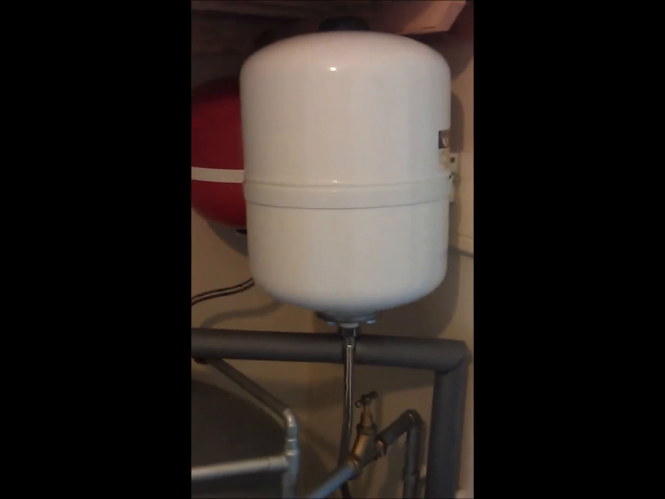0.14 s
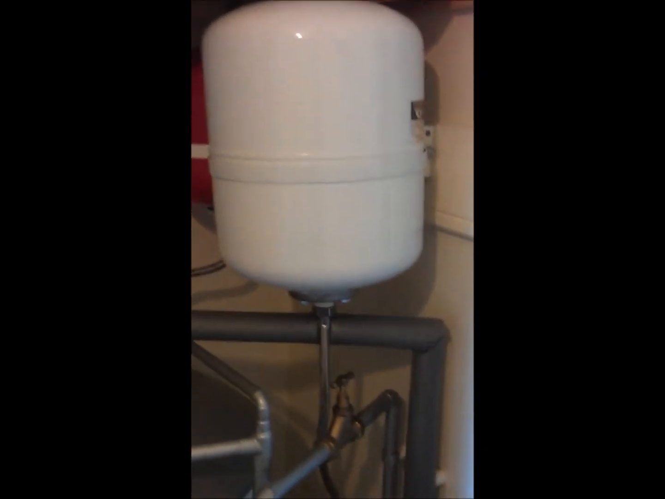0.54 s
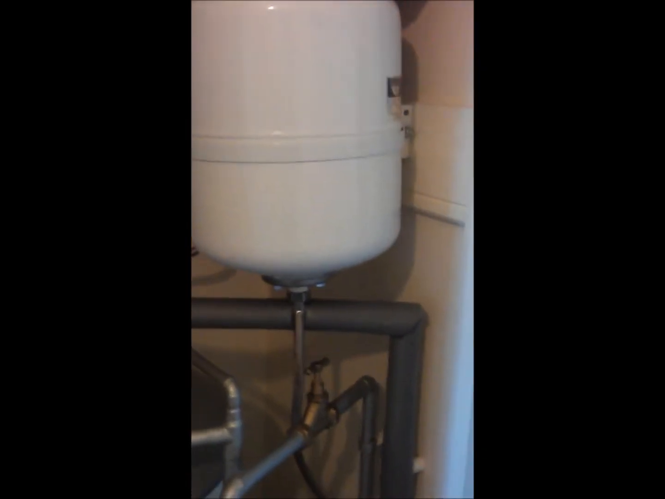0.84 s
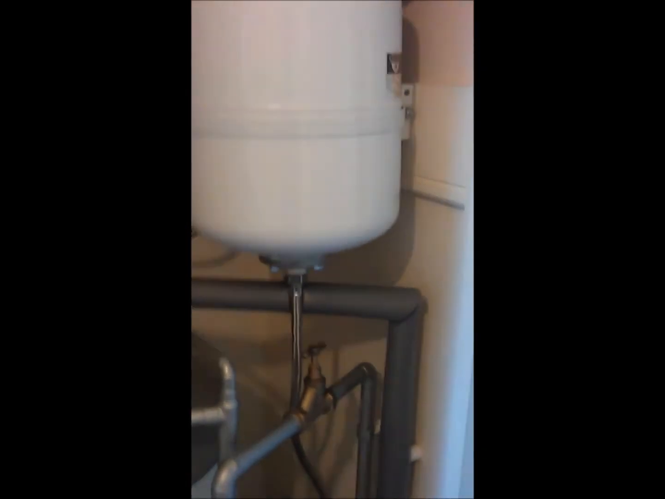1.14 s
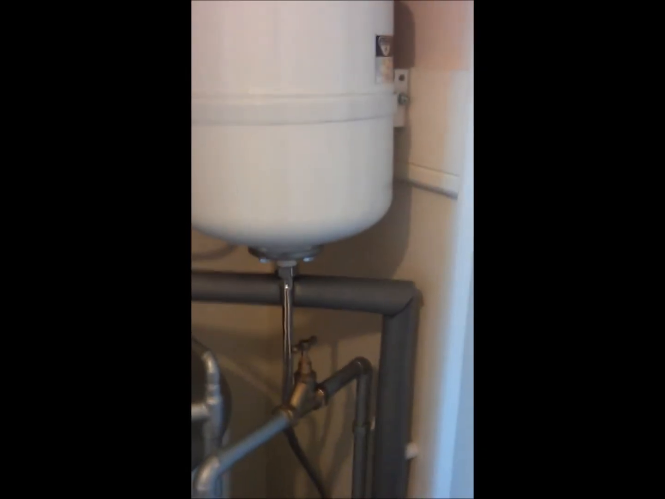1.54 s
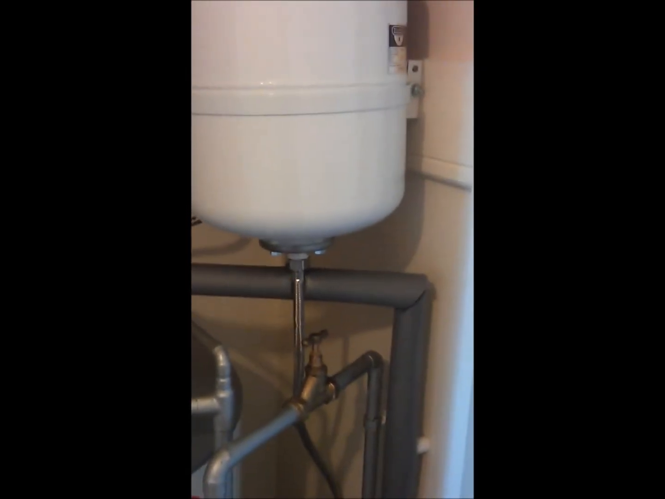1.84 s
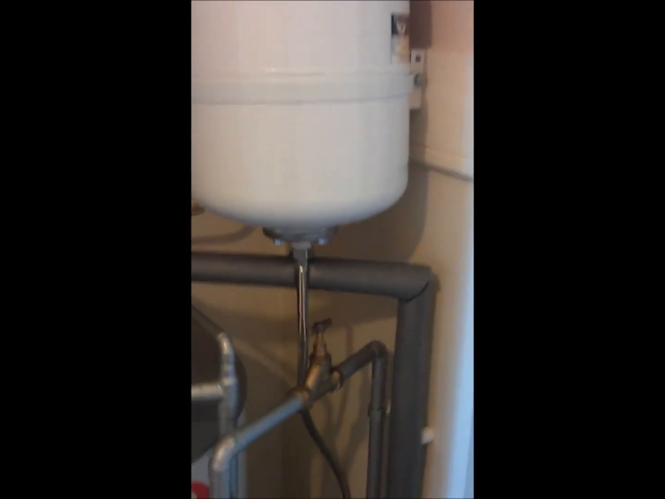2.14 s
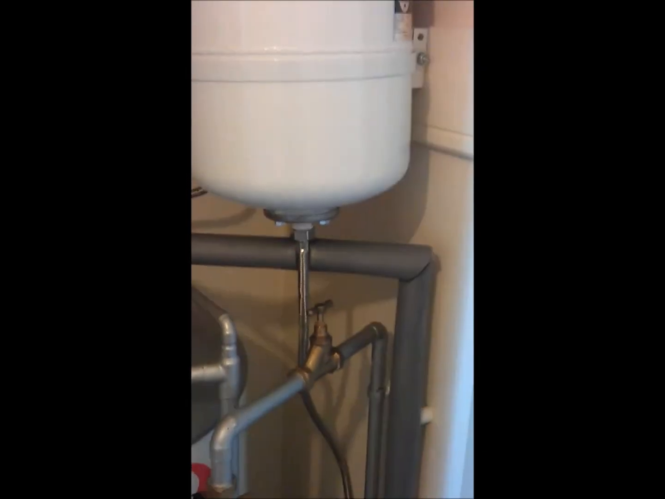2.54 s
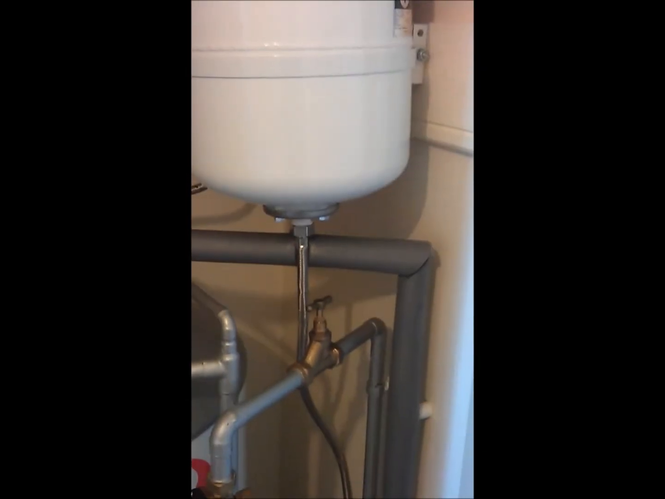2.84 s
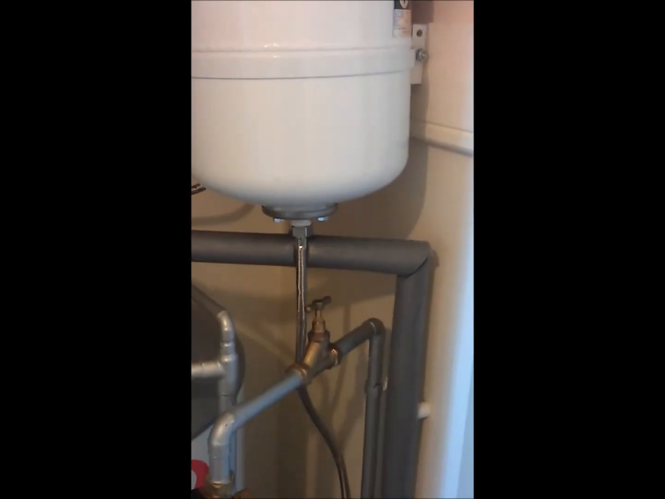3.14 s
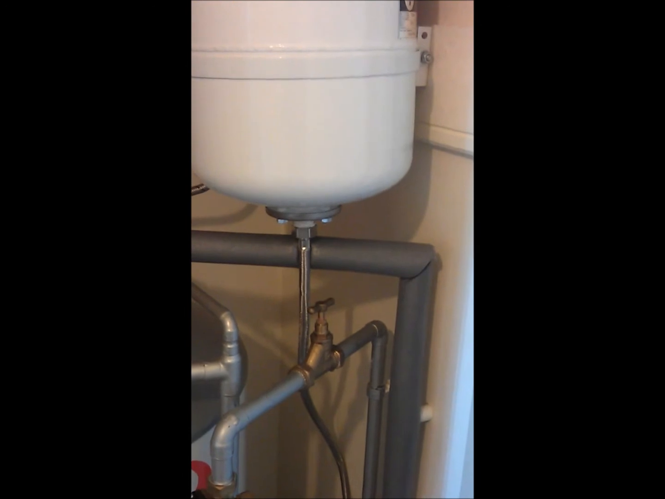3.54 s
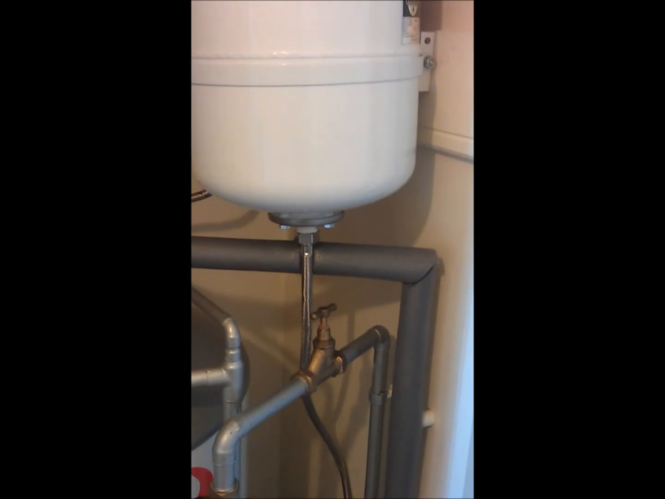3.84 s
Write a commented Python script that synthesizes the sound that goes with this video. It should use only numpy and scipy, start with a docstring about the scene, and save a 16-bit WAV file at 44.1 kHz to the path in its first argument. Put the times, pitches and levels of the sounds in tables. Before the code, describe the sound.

Loud hollow pipe bangs with metallic rattles come first, then steady softer knocks, then tiny rapid taps and water spits, ending in a faint buzz and thin hiss; heard close in a house cupboard.

```python
"""A valve slams about eight times a second under a small tank in a house: water hammer, on two microphones.
Each slam rings the pipework's modes, a dense decaying noise and short sliding tocks of bending waves.
Early on, loose metal clanks as crackling noise bursts with ringing tones. The slams then weaken into a light
chatter, with ticks of spitting water, and a faint hum at multiples of the chatter rate.
Behind it, running water rumbles, sings and hisses as filtered noise and steady tones, and mostly fades."""
import sys
import numpy as np
from scipy import signal
from scipy.fft import rfft, irfft, next_fast_len
from scipy.io import wavfile
from scipy.ndimage import map_coordinates

SR = 44100
rng = np.random.default_rng(int(sys.argv[2]) if len(sys.argv) > 2 else 0)


def unload_audio(sound):
    """Save the sound as a 16-bit wav file, at the path given as the first command line argument."""
    columns = np.transpose(np.atleast_2d(sound))
    # keep every value between -1 and 1, then stretch to whole-number steps
    steps = np.round(np.clip(columns, -1, 1) * 32767)
    wavfile.write(sys.argv[1], SR, steps.astype(np.int16))


N = 176400  # samples: four seconds
ALIKE = 0.22  # left-right correlation of the diffuse sound
CRACKLE_DB = 2  # level scatter within a clank or a spit


def amp(db):
    """Decibels to gain."""
    return 10 ** (np.asarray(db) / 20)


def unit(x):
    """Scale to rms 1."""
    return x / np.sqrt(np.mean(x ** 2) + 1e-20)


def seconds(size):
    """Time of each sample [s]."""
    return np.arange(size) / SR


def along(points, hz):
    """Interpolate (frequency [Hz], value) points on a log frequency axis."""
    f, v = np.transpose(points)
    return np.interp(np.log(hz + 1), np.log(f + 1), v)


def curves(rows):
    """One value per sample for each column after the time."""
    s, *cols = np.transpose(rows)
    return [np.interp(seconds(N), s, c) for c in cols]


def wobble(rate, size=N):
    """A smooth random curve with rate knots a second."""
    knots = rng.standard_normal(1024)
    return map_coordinates(knots, [np.arange(size) * rate / SR], mode="wrap")


def filtered(x, response):
    """Multiply the spectrum of x by a response of frequency."""
    n = x.shape[-1]
    m = next_fast_len(n + 8192)
    gain = response(np.fft.rfftfreq(m, 1 / SR))
    return irfft(rfft(x, m) * gain, m)[..., :n]


def noise(size, response, alike=ALIKE):
    """Coloured stereo noise of rms 1, its two sides partly alike."""
    middle, side = rng.standard_normal((2, size))
    angle = np.arccos(np.clip(alike, -1, 1)) / 2
    stereo = np.cos(angle) * middle + np.outer([1, -1], np.sin(angle) * side)
    return unit(filtered(stereo, response))


def add(out, s, sound):
    """Mix a sound in at time s [s]."""
    part = out[:, max(round(s * SR), 0):][:, :sound.shape[1]]
    part += sound[:, :part.shape[1]]


# valve slams: (time [s], level [dB])
SLAMS = [(.02, -13), (0.1542, -17.5), (0.278, -7), (.4123, -23), (0.4729, -21.5), (.5374, -24), (.662, -19),
         (0.784, -16), (0.913, -19), (1.033, -15.5), (1.1561, -19), (1.277, -21.5), (1.3943, -20.5),
         (1.5123, -22), (1.6256, -24), (1.7366, -23.5), (1.8498, -26), (1.9572, -25.5), (2.069, -24.5),
         (2.1761, -28.5), (2.281, -31), (2.3802, -36.5)]
FRESH_DB = -13  # extra thud drawn anew for each slam


def knocks(ring):
    """Every slam rings the same pipes, with travelling waves and a small thud that differ each time."""
    out = np.zeros((2, N))
    for s, db in SLAMS:
        add(out, s, amp(db) * (ring + waves() + amp(FRESH_DB) * thud()))
    return out


BEND_DELAY_S, BEND_RISE_S = 0.00092, 0.0017  # at 1 kHz


def arrival(t, hz):
    """Onset of a bending wave: low notes travel more slowly, come later and swell more gently."""
    slow = np.sqrt(1000 / np.maximum(hz, 100))
    since = np.maximum(t - BEND_DELAY_S * slow, 0)
    return 1 - np.exp(-since / (BEND_RISE_S * slow ** 2))


# pipework modes: (frequency [Hz], left level [dB], right level [dB], 60 dB decay [s])
PIPE_MODES = [(208, -7.5, -9, 0.23), (237.6, -5.5, -13, .45), (296.7, 8.5, -5.5, 0.19),
              (354.4, -9, -25, 0.25), (492, 5, -9, .25), (582, -34, -7, 0.32), (700, -14, 6, 0.19),
              (867, -1.5, -8, 0.23), (1156, -17, -3.5, 0.2)]
RING_DB, THUD_DB = -10.5, -4.5  # modes and dense ringing


def pipe_ring():
    """The pipework's answer to a slam: decaying modes and dense ringing at both microphones."""
    t = seconds(SR // 2)
    phases = rng.uniform(0, 2 * np.pi, len(PIPE_MODES))
    modes = np.zeros((2, len(t)))
    for (hz, left, right, t60), phase in zip(PIPE_MODES, phases):
        tone = np.sin(2 * np.pi * hz * t + phase + lead(hz))
        modes += amp([[left], [right]]) * tone * arrival(t, hz) * amp(-60 * t / t60)
    return amp(RING_DB) * modes + amp(THUD_DB) * thud()


# dense ringing of the pipes and cupboard: (frequency [Hz], left level [dB], right level [dB])
THUD_COLOUR = [(40, -48, -50), (130, -21, -7), (275, 7, -15), (370, 2, 1), (660, 1, 4), (986, -0.5, -16),
               (1240, -12, -1.5), (1580, -13.5, -13.5), (3330, -15, -14.5), (5496, -27.5, -31),
               (11900, -61, -62)]
# its dying away: (frequency [Hz], 60 dB decay [s])
THUD_DECAY = [(150, 0.55), (300, 0.41), (800, 0.25), (1500, 0.24)]


def thud():
    """Dense ringing after one slam: noise in which each frequency dies at its own speed."""
    f, *sides = np.transpose(THUD_COLOUR)
    white = noise(SR // 2, lambda hz: amp([along(np.c_[f, db], hz) for db in sides]))
    hz, t, z = signal.stft(white, SR, nperseg=256)
    hz = hz[:, None]
    fall = amp(-60 * t / along(THUD_DECAY, hz))
    return signal.istft(z * arrival(t, hz) * fall, SR, nperseg=256)[1][:, :SR // 2]


# bending waves along the pipe and their returns:
# (time of peak after the slam [s], pitch at the peak [Hz], Gaussian length [s], left level [dB], right level [dB])
PIPE_WAVES = [(.0035, 1490, 0.0027, -17, -36), (.0055, 638, 0.0025, -15, 6),
              (.011, 1178, 0.0023, -37, -9.5), (.02, 916, 0.011, -8, -17.5),
              (0.023, 276.6, 0.0096, -1.5, -11), (0.037, 585.4, 0.0027, -13, 0.5)]
FALL_OCTAVES_PER_S = 9


def waves():
    """Each passing bending wave is a short, rough tock that slides down in pitch."""
    t = seconds(SR // 2)
    out = np.zeros((2, len(t)))
    for s, hz, length, left, right in PIPE_WAVES:
        pitch = hz * 2 ** (-FALL_OCTAVES_PER_S * (t - s))
        turns = np.cumsum(pitch) / SR + rng.random()
        phase = 2 * np.pi * turns + .85 * wobble(hz / 4, size=len(t))
        swell = np.exp(-((t - s) / length) ** 2 / 2)
        out += amp([[left], [right]]) * swell * np.sin(phase + lead(hz))
    return out * np.minimum(t / BEND_RISE_S, 1)


# loose metal clanking: (time [s], level [dB], rise [s], brightness [dB per octave])
CLANK_TIMES = [(.002, -14.5, 0.017, 4.5), (.02, -14, 0.0082, 5), (.073, -17, 0.0026, -2),
               (0.133, -21.5, 0.0026, -2), (0.191, -18, 0.013, -1.5), (.262, -14.5, 0.0085, -1.5),
               (.28, -11, 0.0059, -1), (0.33, -18.5, 0.0018, -3), (0.45, -25, 0.005, -2.5),
               (0.519, -26.5, 0.0044, -3.5), (0.703, -25, 0.0069, -9), (0.765, -28.5, 0.0055, -4.5),
               (0.79, -28.5, 0.0041, -3.5)]
# colour of the clanking metal: (frequency [Hz], level [dB])
METAL_COLOUR = [(30, -31), (165, -29), (290, 11.5), (600, 7.5), (1100, -18), (1700, -5), (2600, -4),
                (3100, 6), (3700, -3), (5300, 2), (6600, -4), (8200, 2.5), (9700, -8), (12000, -14)]
# its ringing tones: (frequency [Hz], level [dB])
METAL_RING = [(283, -2), (3026, -14.5), (4151, -18.5), (4515, -17), (7704, -18), (8089, -14.5)]
CLANK_T60, CLANK_TAIL_T60, TONE_T60 = 0.15, 0.15, 0.2  # 60 dB decays [s]
CLANK_TAIL_DB = -11  # smooth tail under the crackling


def clanks(fine):
    """Loose metal rattles in a short, crackling burst and rings on in a few tones."""
    out, t = np.zeros((2, N)), seconds(SR // 2)
    for s, db, rise, bright in CLANK_TIMES:
        def colour(hz):
            tilt = bright * np.log2(np.clip(hz, 1500, 9000) / 4000)
            return fine(hz) * amp(along(METAL_COLOUR, hz) + tilt)

        burst = noise(len(t), colour)
        contacts = unit(amp(CRACKLE_DB * wobble(487, size=len(t))))
        phases = rng.uniform(0, 2 * np.pi, (len(METAL_RING), 2, 1))
        tones = sum(amp(level) * np.sin(2 * np.pi * hz * t + p)
                    for (hz, level), p in zip(METAL_RING, phases))
        after = np.maximum(t - rise, 0)
        crackle = contacts * amp(-60 * after / CLANK_T60)
        tail = amp(CLANK_TAIL_DB - 60 * after / CLANK_TAIL_T60)
        clank = burst * np.hypot(crackle, tail) + tones * amp(-60 * after / TONE_T60)
        add(out, s, amp(db) * np.minimum(t / rise, 1) * clank)
    return out


RIPPLE_DB, RIPPLE_HZ = 2.5, 30.1  # scatter above 2 kHz, and spacing, of the fine resonances


def fine_resonances():
    """Gain by frequency of the tank and pipes' crowded resonances, which colour clanks and hiss."""
    knots = rng.standard_normal(2048)

    def gain(hz):
        ripple = map_coordinates(knots, [hz / RIPPLE_HZ], order=1, mode="wrap")
        return amp(RIPPLE_DB * np.minimum(hz / 2000, 1) * ripple)
    return gain


# valve flutter under the taps: (time [s], rate [beats per s], level [dB])
FLUTTER = [(2.3, 35, -45), (2.95, 28.7, -46.5), (3.3, 30.6, -51), (3.48, 55.5, -51), (4, 53.6, -50.5)]
# light taps of the valve: (time [s], level [dB])
LIGHT_TAPS = [(2.479, -31), (2.548, -35), (2.573, -33.5), (2.621, -36.5), (2.659, -41), (2.7, -38),
              (2.74, -34), (2.778, -37), (2.816, -35), (2.847, -34), (2.882, -33.5), (2.952, -39.5),
              (3.047, -37.5), (3.126, -56), (3.19, -45)]
JITTER_S, SCATTER_DB = .00008, 2  # standard deviations of beat time and level
CHATTER_T60, CHATTER_RING_DB = 0.063, -6  # added damping [s] of the short tap; level of the long ring


def chatter(ring):
    """The valve taps and flutters lightly on the same pipes, quickening late into a buzz."""
    rate, level_db = curves(FLUTTER)
    start = round(FLUTTER[0][0] * SR)
    count = np.floor(np.cumsum(rate[start:]) / SR)
    beats = start + np.flatnonzero(np.diff(count, prepend=-1))
    chance = rng.standard_normal((256, 2))[:len(beats)]
    shift = (JITTER_S * SR * chance[:, 0]).astype(int)
    at = np.clip(beats + shift, 0, N - 1)
    pulses = np.bincount(at, amp(level_db[beats] + SCATTER_DB * chance[:, 1]), N)
    for s, db in LIGHT_TAPS:
        pulses[round(s * SR)] += amp(db)
    t = seconds(ring.shape[1])
    tap = ring * (amp(CHATTER_RING_DB) + amp(-60 * t / CHATTER_T60))
    return signal.fftconvolve(pulses[None], tap, axes=1)[:, :N]


# rms level [dB] of each multiple of the flutter rate, from the first up
HUM_LEVELS = [-75, -63.5, -60, -56, -66, -70]
HUM_START_S, HUM_RISE_S = 3.29, 0.2


def hum():
    """Late on, the pipes hum on multiples of the flutter rate."""
    rate, _ = curves(FLUTTER)
    turn = 2 * np.pi * np.cumsum(rate) / SR
    phases = rng.uniform(0, 2 * np.pi, (len(HUM_LEVELS), 2, 1))
    swell = np.clip((seconds(N) - HUM_START_S) / HUM_RISE_S, 0, 1)
    tones = sum(np.sqrt(2) * amp(db) * np.sin((k + 1) * turn + phases[k])
                for k, db in enumerate(HUM_LEVELS))
    return swell * tones


# brief spits of water in the valve: (time [s], level [dB], pitch [Hz])
WATER_SPITS = [(2.458, -40.5, 1800), (2.488, -45, 2080), (2.513, -39, 1760), (2.561, -36.5, 2054),
               (2.914, -45.5, 2100), (2.945, -43, 2190)]
SPIT_OCTAVES, SPIT_T60 = 0.33, 0.12  # half-width at half gain; 60 dB decay [s]


def spits():
    """Each spit of water is a short, grainy tick of noise around one pitch."""
    out, t = np.zeros((2, N)), seconds(SR // 2)
    for s, db, centre in WATER_SPITS:
        tick = noise(len(t), lambda hz: 1 / (1 + (np.log2((hz + 1) / centre) / SPIT_OCTAVES) ** 2))
        grain = unit(amp(CRACKLE_DB * wobble(416, size=len(t))))
        envelope = amp(db - 60 * t / SPIT_T60) * np.minimum(t / BEND_RISE_S, 1)
        add(out, s, envelope * grain * tick)
    return out


# running water: (time [s], rumble level [dB], hiss level [dB])
WATER_FLOW = [(0, -22.5, -27.5), (.4, -33, -38.5), (.65, -29.5, -39.5), (.9, -27.5, -37.5),
              (1.7, -29.5, -41), (2.15, -27.5, -39.5), (2.33, -33, -43.5), (2.52, -32, -43.5),
              (2.85, -39.5, -44), (3.1, -45, -47.5), (3.3, -52, -49.5), (3.6, -52.5, -48), (4, -58, -50)]
# water-borne resonances: (frequency [Hz], width at half gain [Hz], left level [dB], right level [dB])
RUMBLE_MODES = [(101.2, 15.5, -22, -4), (143, 20.3, -10, -3.5), (190.8, 13.6, 3, -3), (222, 37, 0, -3.5),
                (300.4, 61, 4.5, -19), (396, 275, -6, -23), (559, 93, -6, -1), (710, 100, -42, -12)]
# phase [rad] by which the left microphone leads the right in each of those resonances
LEFT_LEAD = [0.35, 1.42, 1.71, 1.6, 2.4, 4.5, -1.92, 0.5]
BASS_CUT_HZ = 59


def rumble(rough_db=1.33):
    """The flow shakes the pipe's resonances; each reaches the two microphones out of step."""
    level_db, _ = curves(WATER_FLOW)
    turn = np.exp(.5j * np.outer([1, -1], LEFT_LEAD))

    def body(f):
        modes = sum(amp([[left], [right]]) * turn[:, [k]] / (1 + ((f - hz) / width * 2) ** 2)
                    for k, (hz, width, left, right) in enumerate(RUMBLE_MODES))
        return modes * f ** 4 / (f ** 4 + BASS_CUT_HZ ** 4)
    return noise(N, body, alike=0.98) * amp(level_db + rough_db * wobble(40))


def lead(hz):
    """Phase of a pipe note at the left and right microphone, between those of the resonances."""
    between = np.interp(hz, [row[0] for row in RUMBLE_MODES], LEFT_LEAD)
    return between * np.array([[.5], [-.5]])


# pipe notes that the flow keeps singing: (frequency [Hz], rms level over the rumble curve [dB])
PIPE_DRONE = [(198, -11.5), (236, -11), (567, -11.5)]


def drone():
    """The flow sustains a few pipe notes, their phase wandering slightly."""
    level_db, _ = curves(WATER_FLOW)
    t = seconds(N)
    out = np.zeros((2, N))
    for hz, db in PIPE_DRONE:
        phase = 2 * np.pi * hz * t + .5 * wobble(9.2) + lead(hz)
        out += np.sqrt(2) * amp(level_db + db) * np.sin(phase)
    return out


# colour of the strong hiss: (frequency [Hz], level [dB])
HISS_COLOUR = [(30, -11), (300, 2), (800, 10), (1300, -0.5), (2000, 1), (2900, -2.5), (4000, 1), (5300, 1),
               (6600, -4), (8100, 2), (9000, -4), (10000, -9.5), (12200, -11)]
HISS_DIP_HZ, HISS_DIP_DB, HISS_RANGE_DB = 1550, -8.5, 6  # weak flow loses its middle over this level range


def hiss(fine, rough_db=1.23):
    """Water hisses through the valve, thinner as the flow weakens."""
    _, level_db = curves(WATER_FLOW)

    def flow_noise(dip_db):
        def colour(hz):
            dip = dip_db * np.exp(-np.log2((hz + 1) / HISS_DIP_HZ) ** 2)
            return fine(hz) * amp(along(HISS_COLOUR, hz) + dip)
        return noise(N, colour)

    strong, weak = flow_noise(0), flow_noise(HISS_DIP_DB)
    share = np.clip((level_db - level_db.min()) / HISS_RANGE_DB, 0, 1)
    blend = np.sqrt(share) * strong + np.sqrt(1 - share) * weak
    return blend * amp(level_db + rough_db * wobble(30.08))


def scene():
    """Slams, chatter, clanks and flow together under the tank."""
    ring, fine = pipe_ring(), fine_resonances()
    valve = knocks(ring) + chatter(ring + waves()) + hum()
    water = rumble() + drone() + hiss(fine) + spits()
    return valve + clanks(fine) + water


MIC_CUT_HZ, TOP_HZ = 60, 12450  # bass cut and band limit


def record(dry):
    """The recorder clips at full scale, thins the deep bass and cuts steeply above its band limit."""
    def response(hz):
        bass = hz ** 2 / np.hypot(hz ** 2, MIC_CUT_HZ ** 2)
        return bass / np.sqrt(1 + (hz / TOP_HZ) ** 80)
    return filtered(np.clip(dry, -1, 1), response)


dry = scene()
out = record(dry)
unload_audio(out)
```